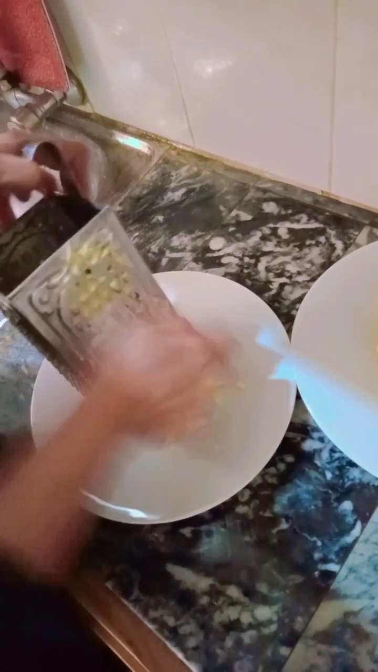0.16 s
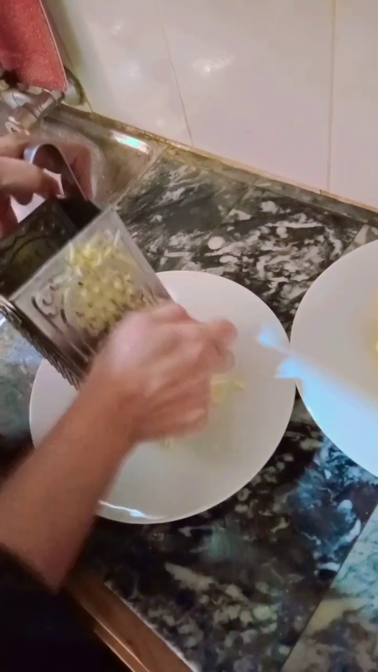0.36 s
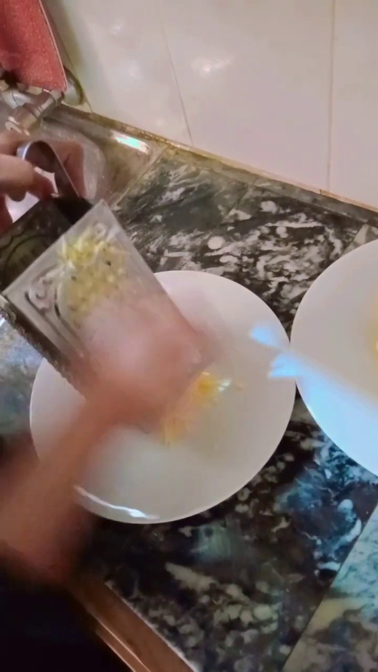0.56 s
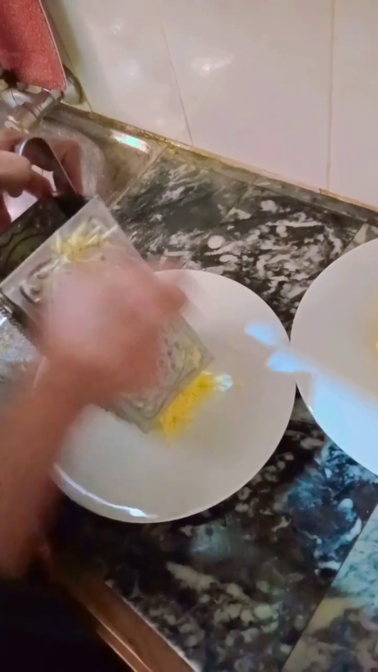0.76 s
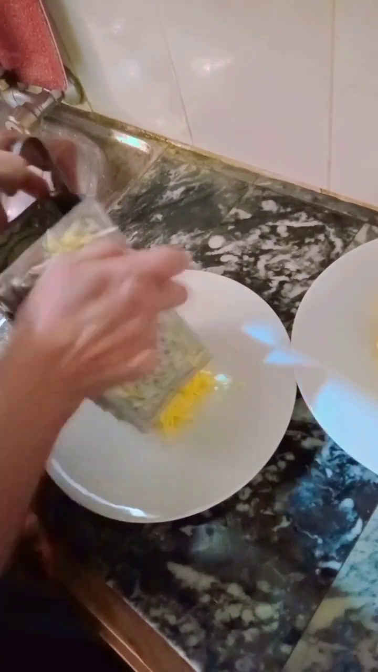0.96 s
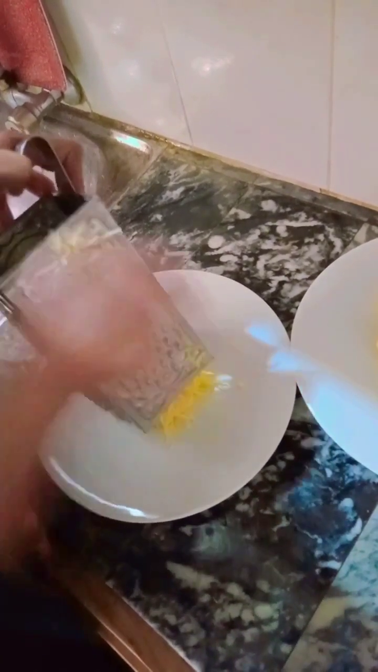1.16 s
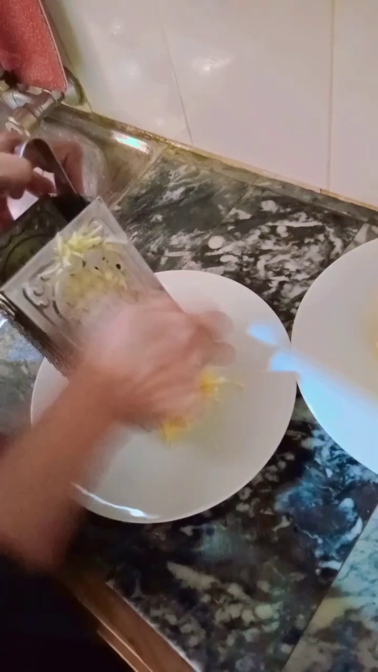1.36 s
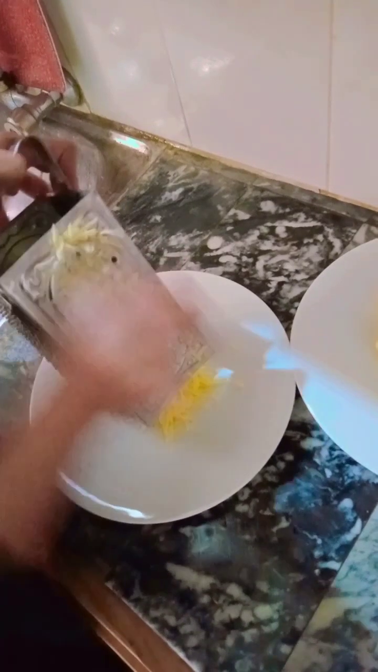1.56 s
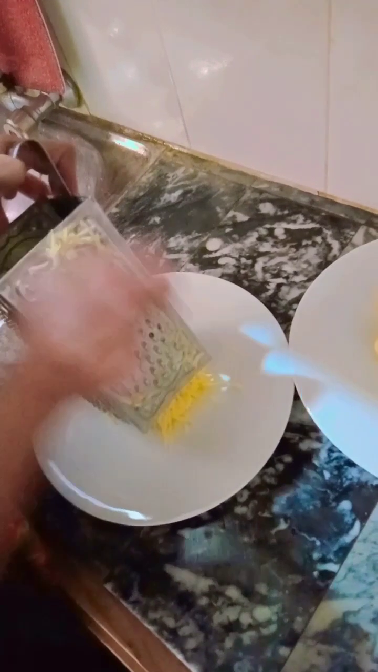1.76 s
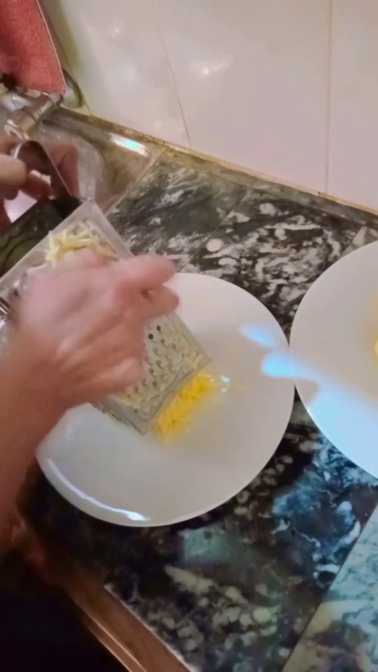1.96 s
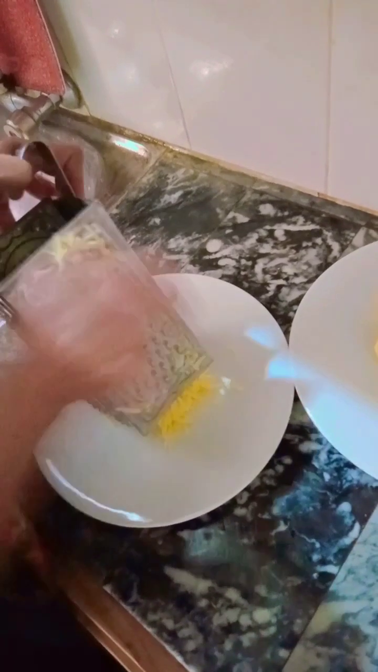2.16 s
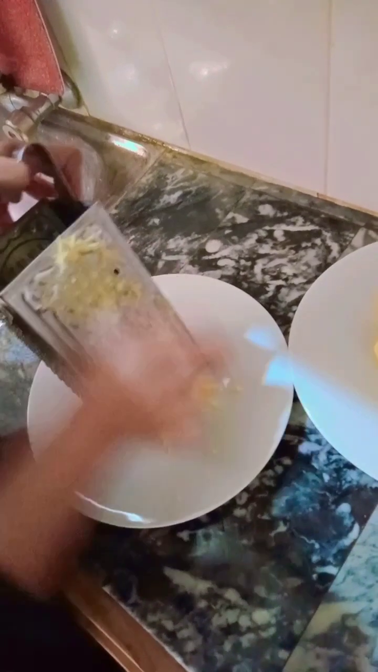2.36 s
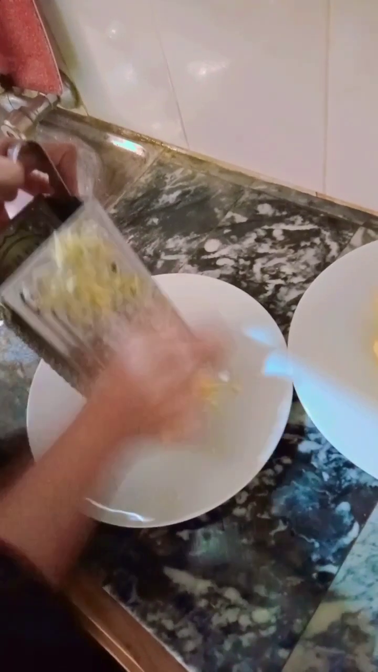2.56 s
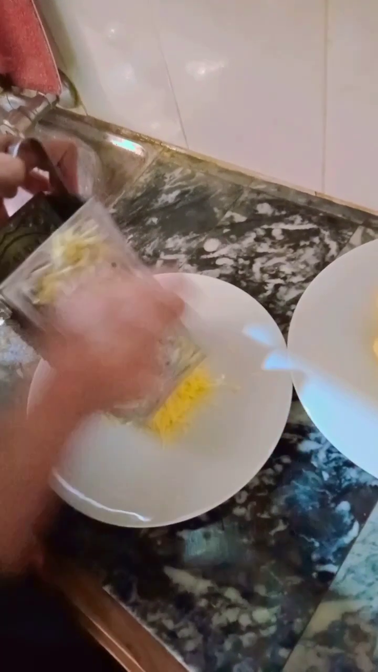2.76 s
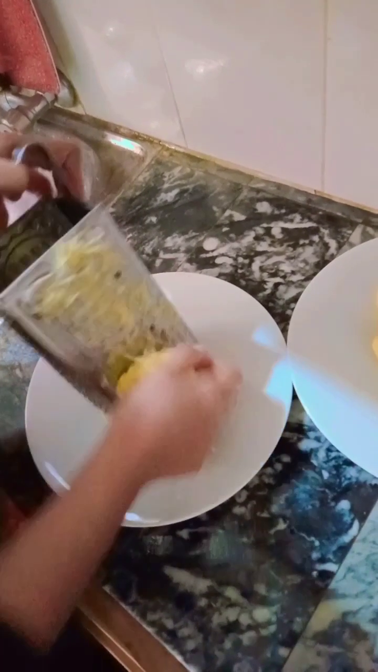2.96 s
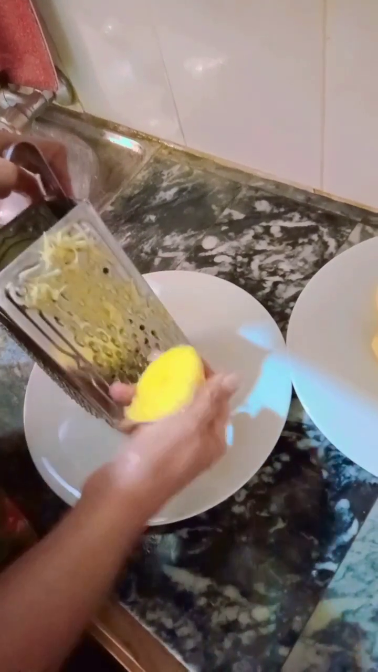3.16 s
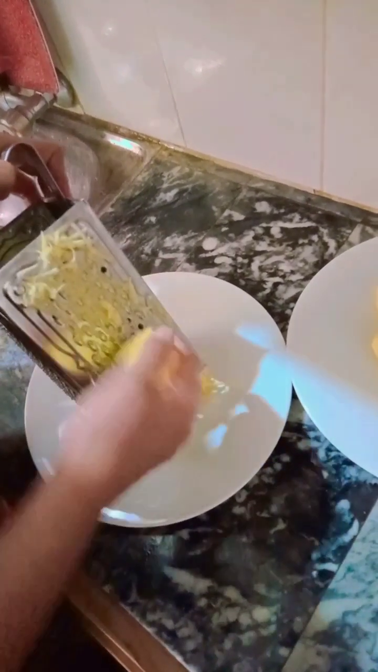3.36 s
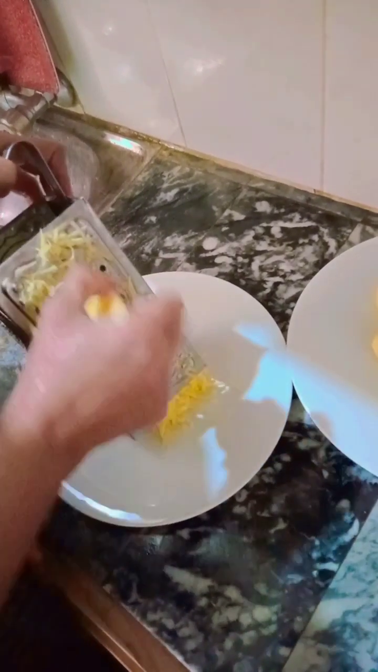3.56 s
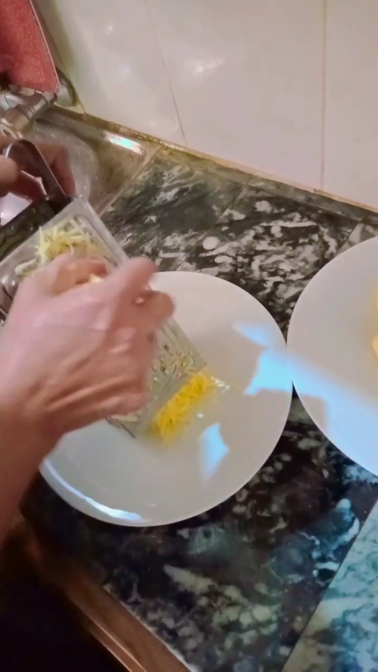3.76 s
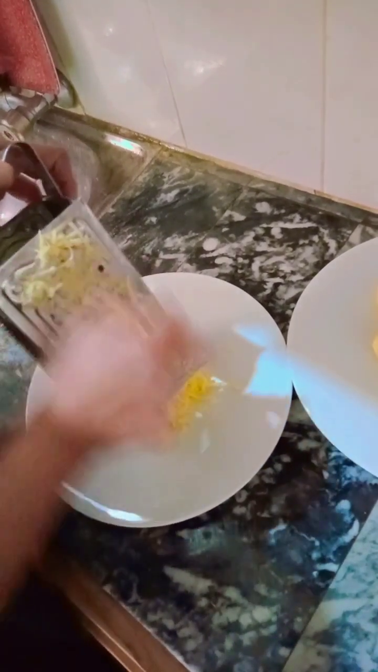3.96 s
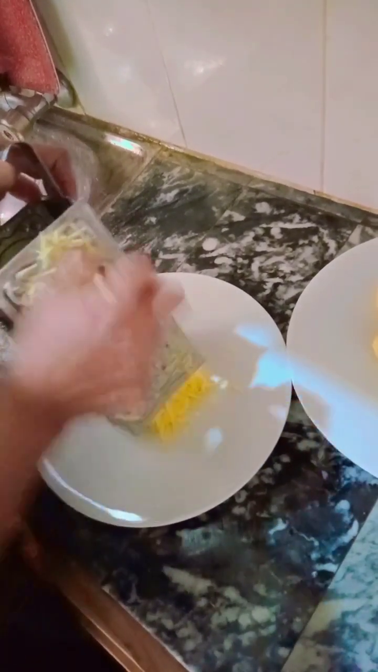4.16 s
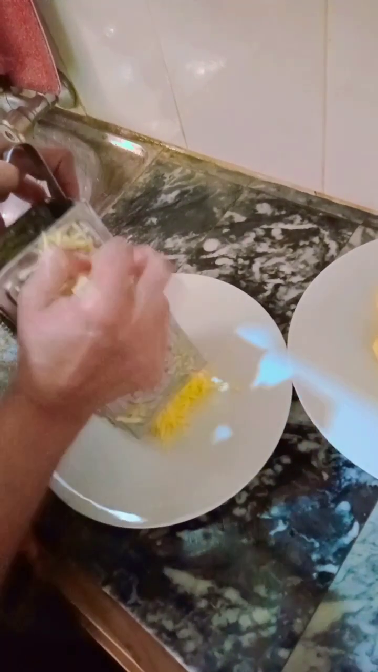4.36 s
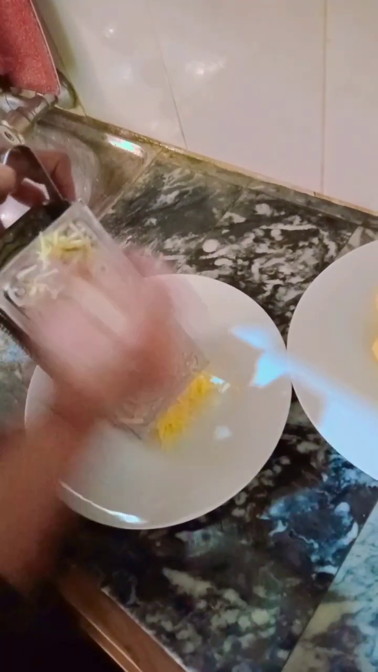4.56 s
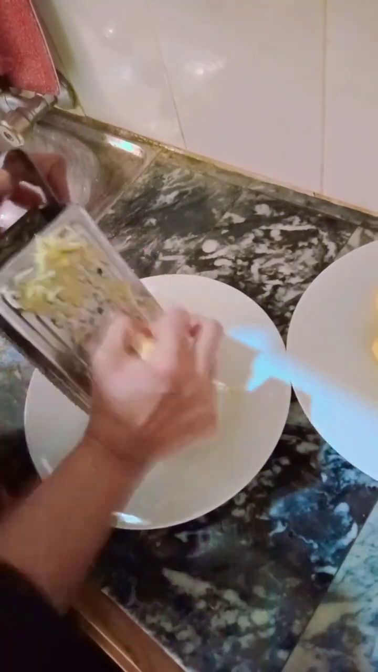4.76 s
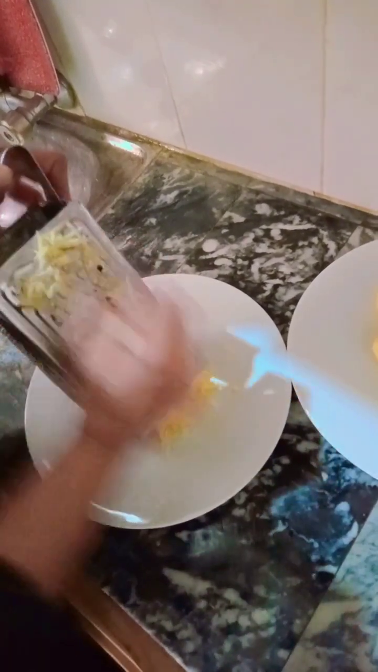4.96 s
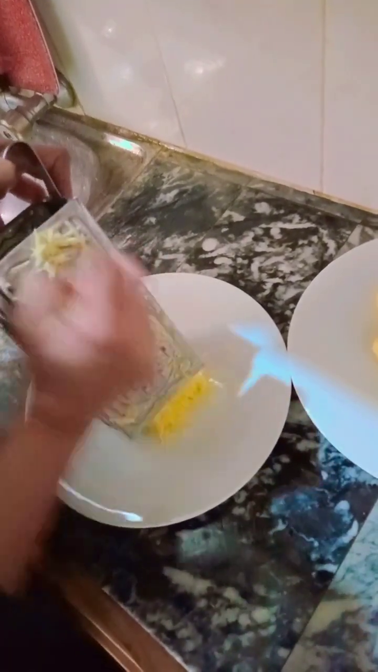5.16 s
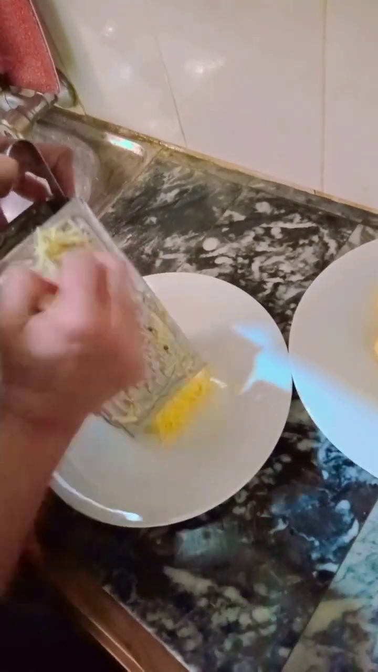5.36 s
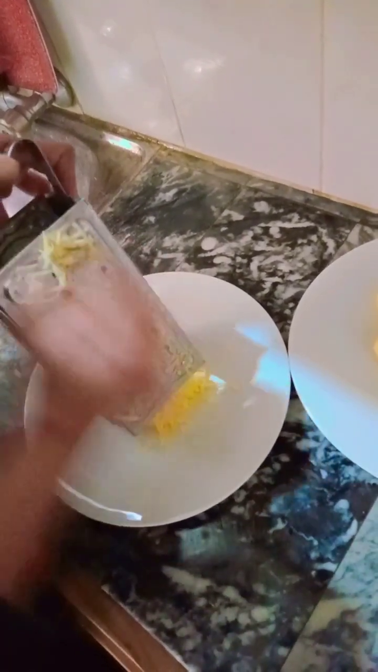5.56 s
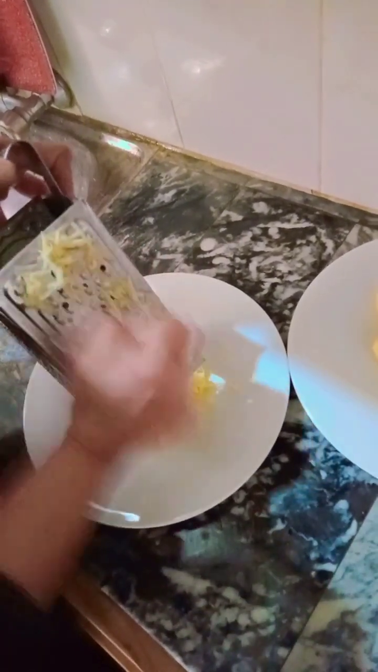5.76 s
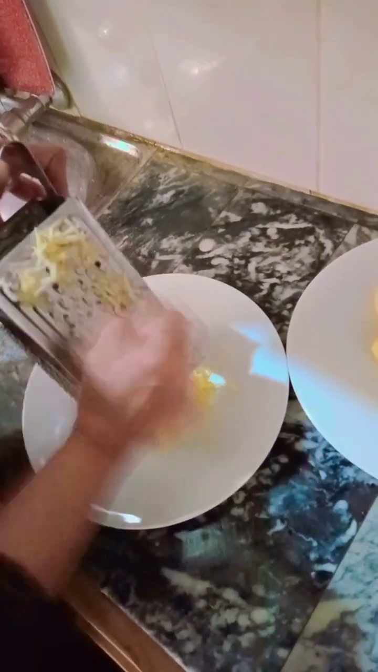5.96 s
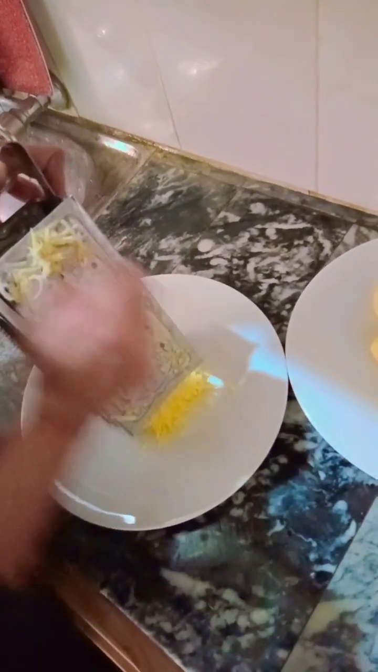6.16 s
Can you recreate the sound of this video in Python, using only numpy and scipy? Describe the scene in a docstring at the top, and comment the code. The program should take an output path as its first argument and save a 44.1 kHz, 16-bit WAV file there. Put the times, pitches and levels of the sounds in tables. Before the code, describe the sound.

Rapid raspy grating of firm wet flesh on hollow metal, a brief gap with a thump and plate knock, then quieter strokes with a china rattle.

```python
"""A potato is grated on a steel box grater: stochastic snaps of flesh on teeth, filtered by the box's resonances.
Long cutting and short return strokes follow as four pairs a second; the hand lets go for about a second.
Thumps are damped noise bursts in the box; knocks, a rattle and a clink on the china plate ring as decaying modes.
A small tiled kitchen answers with a decaying noise tail, over a faint room tone of coloured noise."""
import sys
import numpy as np
from scipy import signal
from scipy.fft import rfft, irfft, next_fast_len
from scipy.io import wavfile
from scipy.ndimage import uniform_filter1d, map_coordinates

SR = 44100
rng = np.random.default_rng(int(sys.argv[2]) if len(sys.argv) > 2 else 0)


def master(y):
    """Save y as 16-bit WAV."""
    cut = np.clip(np.atleast_2d(y).T, -1, 1)
    pcm = np.round(cut * 32767)  # scale
    wavfile.write(sys.argv[1], SR, pcm.astype(np.int16))


N = 272979
GRID = np.fft.rfftfreq(8192, 1 / SR)  # frequencies in Hz at which filter gains are given

# Overall colour of the grating. Each row: frequency in Hz, relative spectral density in dB per Hz.
RASP_COLOUR = [(30, -34.5), (90, -15.5), (290, -11), (360, -2), (560, -4), (900, -2), (1120, -10.5),
               (1850, -10), (2500, -2.5), (4100, -3), (5700, -15), (7300, -15), (11500, -16), (15500, -15)]
# Cutting strokes down the teeth.
# Each row: middle in seconds, relative rasp level in dB, box drone in dB added to the rasp level.
CUTS = [(.116, -25, -3.5), (.353, -25.5, -2.5), (.594, -25.5, -3.5), (.837, -26.5, -3), (1.078, -25, -4.5),
        (1.362, -25.5, -1.1), (1.597, -25.5, -3.5), (1.83, -26.5, -2.5), (2.068, -26.5, -6),
        (2.331, -27.5, -4), (2.588, -26, -4.5), (3.758, -36.5, 1.5), (4.02, -33.3, -1), (4.256, -30.5, -2),
        (4.501, -29.5, -1), (4.754, -28, -4.5), (5.012, -29, -4.5), (5.238, -28.5, -4), (5.487, -33, -3.5),
        (5.737, -32, -3), (5.994, -31.7, -3)]
# Crack of a contact on china. Each row: frequency in Hz, relative spectral density in dB per Hz.
CHINA_CRACK = [(59, -65), (100, -32), (367, -8.5), (482, -15.5), (1110, -1), (1840, -17), (2180, -4.5),
               (2370, -13), (2800, 0), (3180, -20.5), (3760, -14.5), (5720, -36.5), (6220, -37),
               (15000, -53.5)]


def amp(db):
    """Decibels to an amplitude ratio: 20 dB is a factor of ten."""
    return 10 ** (np.asarray(db) / 20)


def unit(x):
    """Normalisation to a root-mean-square value of 1."""
    return x / np.sqrt(np.mean(x ** 2) + 1e-20)


def along(points, hz):
    """Interpolation of (Hz, value) points on a logarithmic frequency axis."""
    f, v = np.transpose(points)
    return np.interp(np.log(hz + 1), np.log(f + 1), v)


def wobble(rate):
    """Smooth random modulation: a spline through random knots, rate of them a second."""
    knots = rng.standard_normal(int(N * rate / SR) + 4)
    return map_coordinates(knots, [np.arange(N) * rate / SR])


def coloured(x, gain):
    """Minimum-phase filtering: the folded cepstrum of the GRID gains gives a causal response of energy 1."""
    cepstrum = irfft(np.log(np.maximum(gain, 1e-6)))
    half = len(cepstrum) // 2
    cepstrum[1:half] *= 2
    cepstrum[half + 1:] = 0
    response = irfft(np.exp(rfft(cepstrum)))
    return signal.fftconvolve(x, response / np.linalg.norm(response))[:len(x)]


def add(track, s, sound):
    """Superposition: a sound adds linearly to the track from time s in seconds."""
    part = track[round(s * SR):][:len(sound)]
    part += sound[:len(part)]


def grating():
    """Stochastic excitation: teeth cut flesh in snaps, denser with speed, and the steel box filters them."""
    # the soft potato takes a few milliseconds to bite and to let go
    speed, rasp, hiss, drone = uniform_filter1d(hand(swell=(1.7, 1.9, 1.4)), size=420, axis=1)
    catch = amp(1.18 * wobble(170) + 0.24 * wobble(31))  # rows of teeth catch and let go
    cuts = snaps(3000 + 6000 * speed, spread_db=0.6) * catch
    tearing_snaps = snaps(1500 + 7000 * speed, spread_db=0.5)
    tearing = unit(tearing_snaps + 0.96 * rng.standard_normal(N)) * catch
    steel = box_gain(RASP_COLOUR)
    # the walls drone below, the teeth rasp in the middle, the wet flesh hisses on top
    above_drone = 1 / (1 + (1350 / (GRID + 1)) ** 8)
    above_rasp = 1 / (1 + (5400 / (GRID + 1)) ** 10)
    walls = amp(-1.32) * coloured(cuts * drone, steel * np.sqrt(1 - above_drone))
    teeth = amp(-0.4) * coloured(cuts * rasp, steel * np.sqrt(above_drone * (1 - above_rasp)))
    flesh = amp(-0.14) * coloured(tearing * hiss, steel * np.sqrt(above_rasp))
    return wandering(walls + teeth + flesh + rubbing(tilt_db=-3.0), depth_db=4.0, width_hz=55, life=.05)


def hand(swell):
    """Stroke kinematics: each stroke is one arc of speed; rasp, hiss and drone grow as powers of it."""
    drone_lead_s = 0.0032  # the box is loaded just before the teeth cut
    t = np.arange(N) / SR
    speed, rasp, hiss, drone = np.zeros((4, N))
    for middle, length, (peak, flatness), db, hiss_db, drone_db in strokes():
        near = np.abs(t - middle) < length
        progress = (t[near] - middle + np.array([[0], [drone_lead_s]])) / length + .5
        from_peak = np.interp(progress, [0, peak, 1], [1, 0, 1])
        arc, load = 1 - from_peak ** flatness
        speed[near] += arc
        rasp[near] += amp(db) * arc ** swell[0]
        hiss[near] += amp(db + hiss_db) * arc ** swell[1]
        drone[near] += amp(db + drone_db) * load ** swell[2]
    return speed, rasp, hiss, drone


def strokes():
    """Reciprocating motion: passes as (middle s, length s, shape, rasp dB, hiss and drone dB re rasp)."""
    # Lighter return strokes over the backs of the teeth. Each row: middle in seconds, length in seconds,
    # relative rasp level in dB, box drone in dB added to the rasp level.
    return_rows = [(.003, .11, -25, -2), (0.238, 0.092, -28.5, -5.5), (0.488, 0.084, -27, -4),
                   (0.732, 0.091, -25.5, -3), (0.972, 0.099, -28, -2), (1.222, 0.11, -28, -7),
                   (1.495, 0.099, -27.5, -4), (1.724, 0.098, -30, -4.5), (1.96, 0.098, -30, 0),
                   (2.216, 0.094, -27.5, -5.5), (2.472, 0.11, -28, -3.5), (3.898, 0.1, -34.5, 0.5),
                   (4.141, 0.13, -32, 1.5), (4.388, 0.1, -30, -1), (4.648, 0.087, -27, -2.5),
                   (4.898, 0.094, -27.5, -2.5), (5.14, 0.084, -29, -1), (5.386, 0.091, -32.5, 0),
                   (5.627, 0.11, -34.5, -3.5), (5.89, 0.1, -32.3, -2.5), (6.136, 0.11, -33.5, -5)]
    # Light brushes while the potato is turned in the hand.
    # Each row: middle in seconds, length in seconds, relative rasp level in dB.
    brush_rows = [(2.707, .16, -55.5), (2.829, 0.064, -56.5), (3.344, .07, -59), (3.45, 0.052, -63),
                  (3.593, 0.032, -58.5), (3.652, .11, -64)]
    # share of the length before the peak, flatness (2 = a parabola, more = a steadier middle)
    cut_shape, return_shape = (.52, 2.47), (.58, 1.81)
    cut_s, cut_hiss_db = 0.14, -0.76
    turn_s, turned_hiss_db = 3.3, -3  # once the potato is turned, its returns slide duller
    cuts = [(s, cut_s, cut_shape, db, cut_hiss_db, drone_db) for s, db, drone_db in CUTS]
    returns = [(s, length, return_shape, db, -2.2 + turned_hiss_db * (s > turn_s), drone_db)
               for s, length, db, drone_db in return_rows]
    brushes = [(s, length, return_shape, db, -5.5, 2) for s, length, db in brush_rows]
    return cuts + returns + brushes


def snaps(rate, spread_db):
    """Random impulse process: about rate tiny snaps a second, of uneven size and mean power 1."""
    chance = np.clip(rate / SR, 1e-4, 1)
    struck = rng.random(N) < chance
    size = rng.standard_normal(N) * amp(spread_db * rng.standard_normal(N))
    return unit(struck * size / np.sqrt(chance))


def rubbing(tilt_db):
    """Sliding friction without cutting: smooth noise, tilted by tilt_db per octave above 1 kHz."""
    level = amp(-15) * pressure()  # 15 dB under the nearby cuts
    dull = amp(tilt_db * np.log2(np.maximum(GRID, 1000) / 1000))
    return coloured(level * rng.standard_normal(N), box_gain(RASP_COLOUR) * dull)


def pressure():
    """Contact force follows the level of the cuts, with exponential rise and fall as the hand presses and lifts."""
    # The potato stays pressed to the steel between strokes. Each row: start in seconds, end in seconds.
    bouts = [(-.1, 2.66), (3.72, 6.3)]
    press_s, lift_s = .01, .035  # time constants
    t = np.arange(N) / SR
    touching = sum(np.exp(-np.maximum(on - t, 0) / press_s - np.maximum(t - off, 0) / lift_s)
                   for on, off in bouts)
    return touching * amp(np.interp(t, *np.transpose(CUTS)[:2]))


def box_gain(spectrum):
    """Resonance: a smooth spectrum is lifted by a bell at each mode of the steel box."""
    # Resonances of the steel box. Each row: frequency in Hz, width in Hz, lift in dB.
    resonances = [(256, 17, 5.5), (364.7, 61, 10), (442, 48, 7), (478.7, 31, 6), (663, 44, 3),
                  (736, 55, 5.5), (913, 66, 6.5), (1256, 16, 5.5), (1380, 26, 7), (1703, 37, 7),
                  (2097, 61, 4.5), (2417, 115, 6), (2620, 40, 0), (2775, 100, 5), (2900, 48, 1.5),
                  (3110, 70, 3.5), (3427, 45, 5), (3689, 83, 7), (3753, 44, 5.5), (4170, 55, 4.5),
                  (8820, 2050, 13), (13700, 1500, 0)]
    lift_db = sum(db / (1 + (2 * (GRID - hz) / width) ** 2) for hz, width, db in resonances)
    return amp(along(spectrum, GRID) + lift_db)


def wandering(x, depth_db, width_hz, life):
    """Variable loading: the potato presses on shifting spots of the sheet, so resonances come and go."""
    hz, t, z = signal.stft(x, SR, nperseg=1024, noverlap=768)
    rows, cols = np.meshgrid(hz / width_hz, t / life, indexing="ij")
    field = map_coordinates(rng.standard_normal((600, 400)), [rows, cols], order=1, mode="wrap")
    depth = depth_db / (1 + hz[:, None] / 8000)  # the crowded high modes average out
    moved = signal.istft(z * amp(depth * unit(field)), SR, nperseg=1024, noverlap=768)[1][:N]
    return unit(moved) * np.std(x)


def burst(t60):
    """Exponential decay: a puff of noise falls by 60 dB in t60 seconds."""
    t = np.arange(SR // 2) / SR
    return rng.standard_normal(len(t)) * amp(-60 * t / t60)


def thumps():
    """Damped impact: the potato bumps the box, and each spot favours another resonance."""
    # Bumps against the box. Each row: start in seconds, relative level in dB,
    # treble tilt in dB per octave, strongest resonance in Hz.
    bumps = [(0.325, -18.5, -2.5, 475), (1.309, -14, 0.5, 807), (1.572, -16.5, -6, 470),
             (2.679, -16.5, -2, 360), (2.688, -20.5, -4.5, 938), (2.712, -23.5, -7.5, 237),
             (2.727, -25.5, -8, 174), (2.789, -41, -12, 170), (3.719, -23.5, -4.5, 405),
             (3.737, -19, -3.5, 413), (3.866, -18, -5.5, 640), (3.884, -18, -9, 442),
             (4.090, -12, -1.5, 670), (4.117, -14.5, -3.5, 326), (4.226, -17.5, -1, 423),
             (4.473, -14, 1, 420), (4.880, -18, 2.5, 380), (5.122, -17, 0, 665)]
    # Colour of a bump. Each row: frequency in Hz, relative spectral density in dB per Hz.
    bump_colour = [(40, -44.5), (150, -11.5), (300, -9.5), (380, -2), (1000, 0.5), (1800, -5.5),
                   (3300, -5.5), (5000, -29), (8000, -35.5), (15000, -41.5)]
    track = np.zeros(N)
    for s, db, tilt_db, hz in bumps:
        tilt = tilt_db * np.log2(np.maximum(GRID, 150) / 400)
        favoured = 10 / (1 + ((GRID - hz) / 28) ** 2)
        gain = box_gain(bump_colour) * amp(tilt + favoured)
        add(track, s, amp(db - 6.5) * coloured(burst(t60=0.088), gain))
    return track


def clatter(blows, modes, crack, ring_db, crack_db, crack_t60, damping):
    """Modal synthesis: each hard contact gives a noise crack and rings decaying modes at new strengths."""
    track, t = np.zeros(N), np.arange(SR // 2) / SR
    hz, level, t60 = np.transpose(modes)[:, :, None]
    for s, db in blows:
        size = amp(level + 2 * rng.standard_normal(hz.shape))
        phase = 2 * np.pi * (hz * t + rng.random(hz.shape))
        decay = amp(-60 * damping * t / t60)
        ring = np.sum(size * np.sin(phase) * decay, axis=0) / np.linalg.norm(size)
        ring *= 1 - np.exp(-t / 0.00043)  # soft onset
        snap = coloured(burst(crack_t60), amp(along(crack, GRID)))
        add(track, s, amp(db) * (amp(ring_db) * ring + amp(crack_db) * snap))
    return track


def knocks():
    """Repeated impact: the grater's foot drops on the plate and bounces, ringing its modes."""
    # Contacts of the foot. Each row: start in seconds, relative level in dB.
    blows = [(2.860, -18.5), (2.864, -17), (2.880, -26.5)]
    # Modes. Each row: frequency in Hz, mean relative level in dB, T60 in seconds before added damping.
    modes = [(245, -19, 0.25), (371, 0.5, 0.28), (488, -19, 0.42), (677, -7, 0.16), (738, -7, 0.19),
             (870, -5, 0.18), (1183, -6.5, 0.17), (1580, -3, 0.057), (1810, -20, 0.14), (2200, 1.5, 0.059),
             (2250, -17, 0.32), (2840, -9.5, 0.2), (2830, -21, 0.27), (2960, -10, .14), (3171, -18, .19),
             (3700, -9, 0.14), (3910, -17, .16), (4960, -23, 0.18), (6869, -37, .22), (9383, -25, .13)]
    # Crack. Each row: frequency in Hz, relative spectral density in dB per Hz.
    crack = [(59, -53), (100, -26.5), (352, -10.5), (535, -7.5), (1160, -1), (1350, -11), (1590, -2.5),
             (2180, -8), (2630, -10.5), (2860, -7.5), (4840, -19.5), (5960, -45), (6760, -24.5),
             (15000, -42)]
    return clatter(blows, modes, crack, ring_db=-2.5, crack_db=-2, crack_t60=0.068, damping=1.08)


def plate_rattle():
    """Chattering contact: the plate rattles against the neighbouring plate, each blow ringing the china's
    modes."""
    # Contacts of the plate. Each row: start in seconds, relative level in dB.
    blows = [(5.287, -16.5), (5.295, -10.5), (5.299, -17), (5.3075, -13), (5.328, -16), (5.333, -24.5),
             (5.350, -24), (5.361, -29)]
    # Modes. Each row: frequency in Hz, mean relative level in dB, T60 in seconds before added damping.
    modes = [(361, -10.5, 0.53), (617.5, -18, 0.42), (910, -9, 0.14), (1050, -6, 0.081), (1123, -1, 0.24),
             (1330, -17, .25), (1410, -14, .1), (1470, -7.5, 0.25), (1550, -4, 0.23), (1725, -8, 0.21),
             (2150, -6, 0.099), (2190, -4.5, 0.23), (2360, -12, 0.12), (2747, -6, 0.25), (2840, -7.5, .09),
             (2920, -4.5, .22), (3000, -15, .12), (3530, -6.5, 0.1), (3630, -0.5, 0.18), (3730, -4, .11),
             (3930, -10, .12), (4460, -18, 0.12), (4735, -13.5, 0.12), (4940, -13, 0.11), (5297, -25, 0.16),
             (6230, -35, .25)]
    return clatter(blows, modes, CHINA_CRACK, ring_db=-0.2, crack_db=-1, crack_t60=0.058, damping=1.42)


def edge_clink():
    """Single impact: the grater's edge ticks against the plate and rings a few modes."""
    # Ticks. Each row: start in seconds, relative level in dB.
    blows = [(5.568, -24.5)]
    # Modes. Each row: frequency in Hz, mean relative level in dB, T60 in seconds before added damping.
    modes = [(926, -3.5, 0.094), (1660, -13, .2), (2350, -2, 0.059), (2520, -9, 0.09), (2930, -3, 0.29),
             (3680, -8, .12), (4400, -16, .15), (6300, -30, .2)]
    return clatter(blows, modes, CHINA_CRACK, ring_db=1, crack_db=1.5, crack_t60=.035, damping=1.3)


def kitchen(x):
    """Reverberation: convolution with a noise tail whose decay time depends on frequency."""
    # Decay of the tiled room. Each row: frequency in Hz, T60 in seconds.
    room_decay = [(150, 0.72), (700, 0.4), (2500, 0.4), (5000, 0.22), (10000, 0.26)]
    hz, t, z = signal.stft(rng.standard_normal(SR // 2), SR, nperseg=256)
    tail = signal.istft(z * amp(-60 * t / along(room_decay, hz)[:, None]), SR, nperseg=256)[1]
    delayed = np.pad(x, (round(.005 * SR), 0))  # the tail starts 5 ms late
    return signal.fftconvolve(delayed, tail / np.linalg.norm(tail))[:N]


def room_tone():
    """Stationary noise: Gaussian noise shaped to the colour of the quiet room."""
    # Colour of the room tone. Each row: frequency in Hz, relative spectral density in dB per Hz.
    air_colour = [(15, -39.5), (30, -21.5), (85, -1.5), (200, -3), (400, 0.5), (700, 1), (1200, -12),
                  (1800, -15), (2500, -12.5), (3700, -14), (5500, -34.5), (9200, -28), (15500, -42.5)]
    return amp(-61.5) * unit(coloured(rng.standard_normal(N), amp(along(air_colour, GRID))))


def scene():
    """Superposition of grating, bumps and clatter, their reverberation and a faint room tone."""
    knock, rattle, clink = knocks(), plate_rattle(), edge_clink()
    near = grating() + thumps() + knock + rattle + clink
    air = room_tone()
    return (near + amp(-15.5) * kitchen(near) + air)[None]


def record(dry):
    """Band limitation: spectral components from 15650 Hz upward are removed."""
    top_hz = 15650
    size = next_fast_len(N + SR // 2)
    kept = np.fft.rfftfreq(size, 1 / SR) < top_hz
    return irfft(rfft(dry, size) * kept, size)[:, :N]


dry = scene()
out = record(dry)
master(out)
```